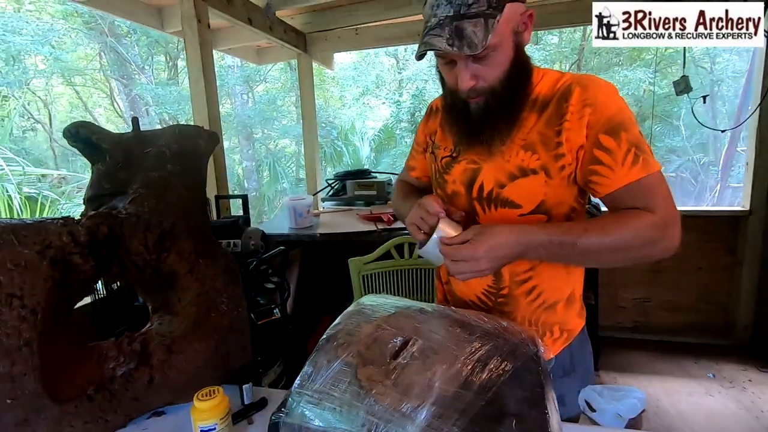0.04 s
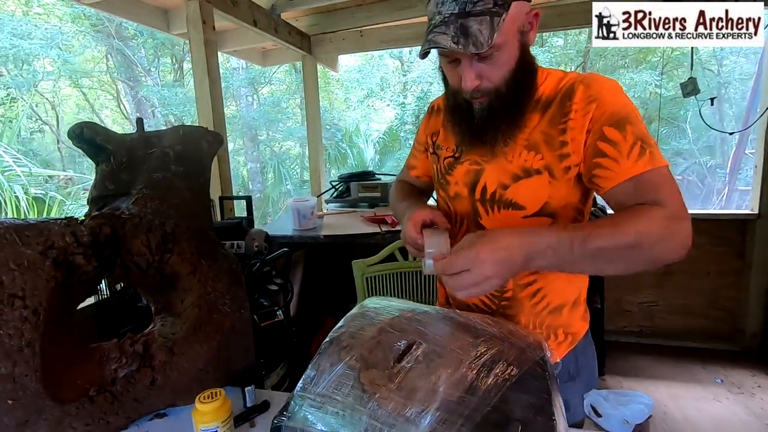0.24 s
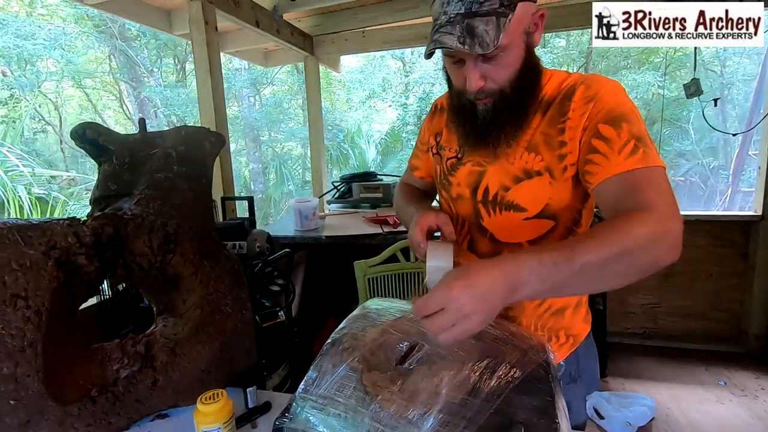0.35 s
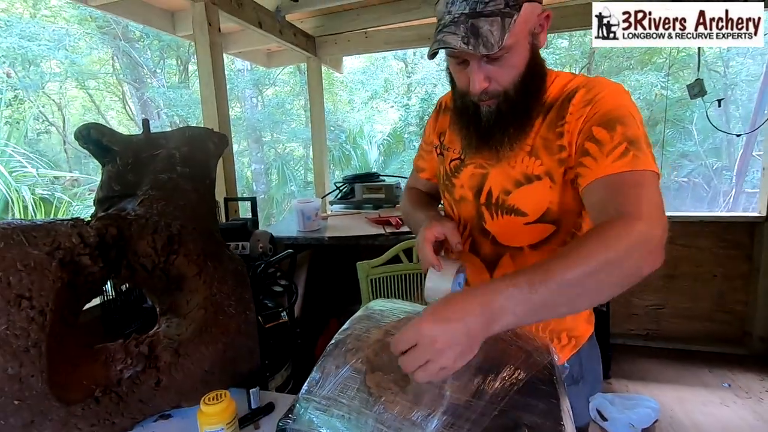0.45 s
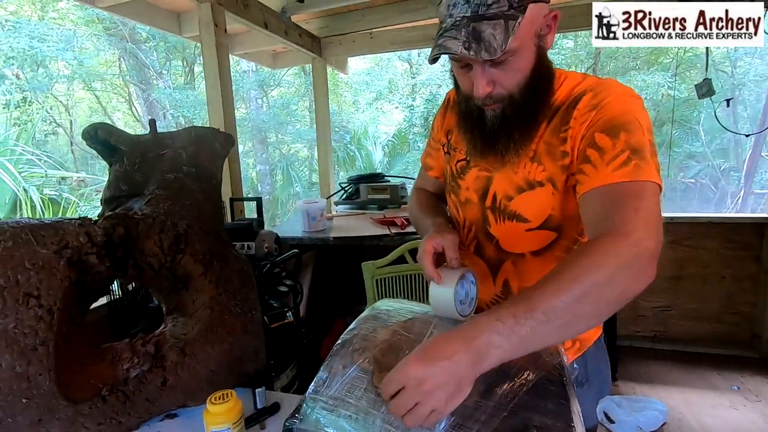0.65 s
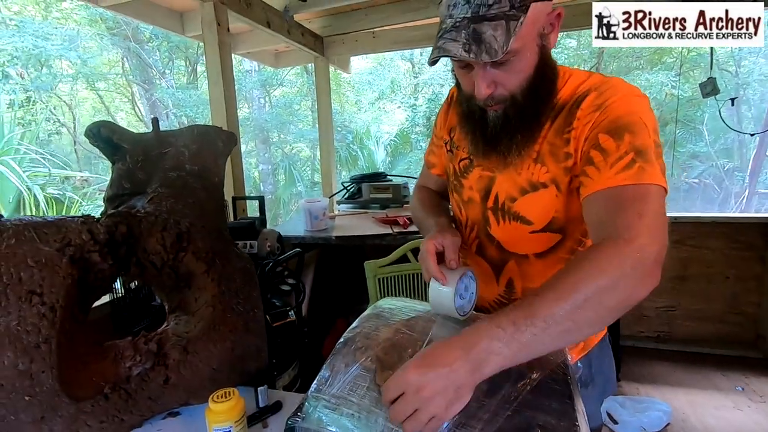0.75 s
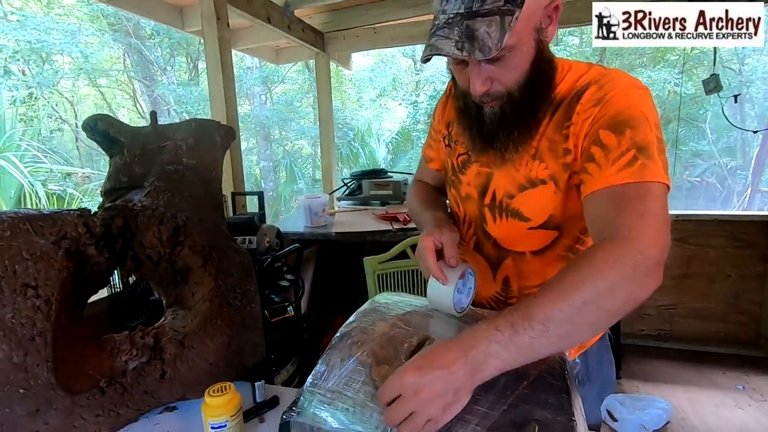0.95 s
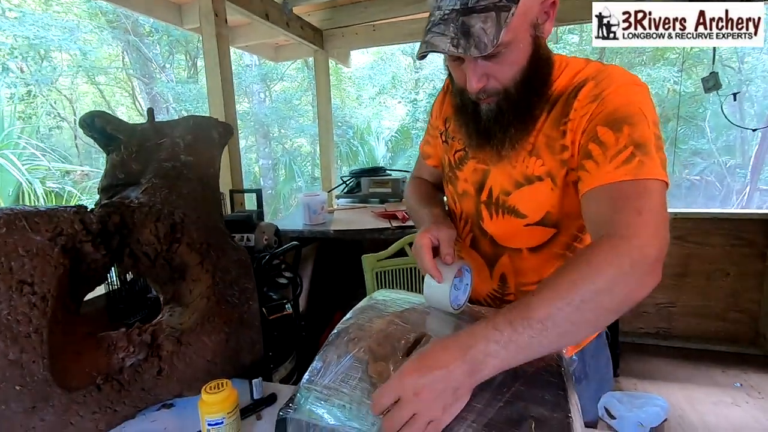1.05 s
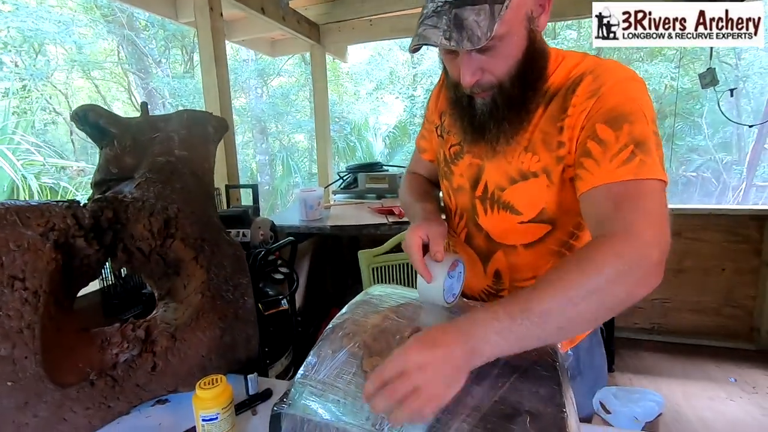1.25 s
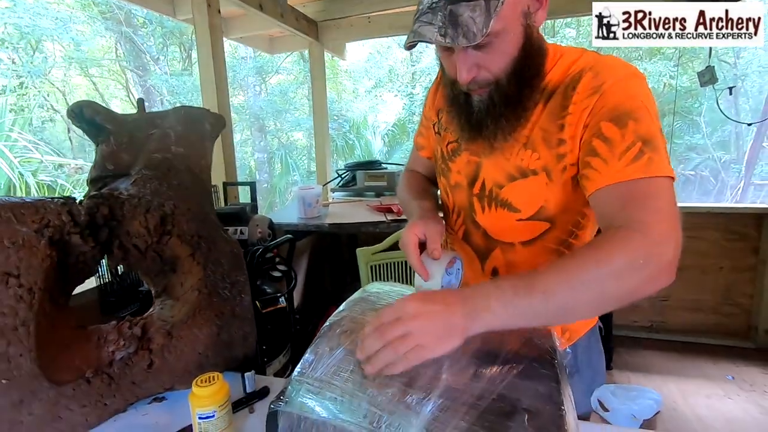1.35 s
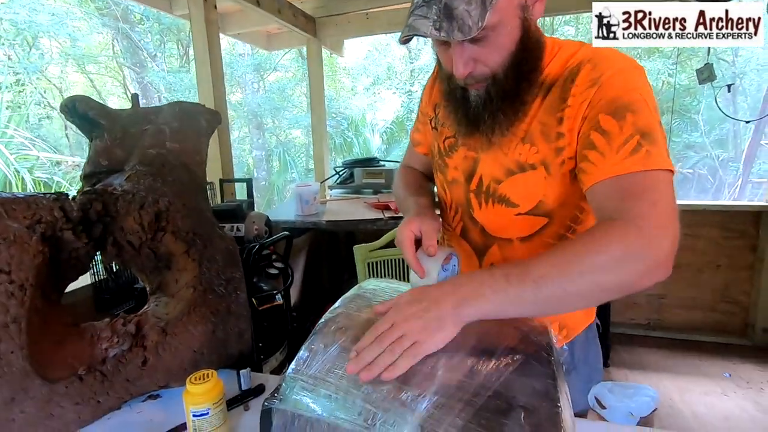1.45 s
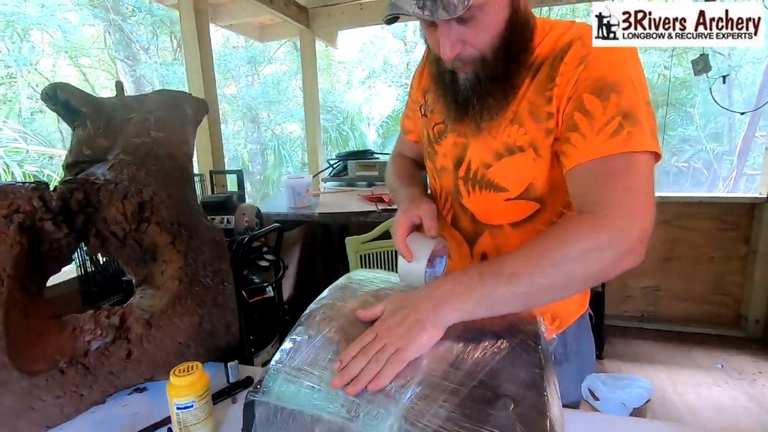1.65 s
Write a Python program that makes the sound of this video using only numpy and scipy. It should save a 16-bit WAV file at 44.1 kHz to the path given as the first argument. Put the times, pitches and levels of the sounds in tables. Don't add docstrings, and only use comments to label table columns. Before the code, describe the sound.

Adhesive tape is torn off a roll in one longer rasping rip and a few shorter jerks, then fingers land on plastic sheet with a sharp snap; small wooden shed, close stereo microphone, faint outdoor hiss.

```python
import sys
import numpy as np
from scipy import signal
from scipy.io import wavfile
from scipy.ndimage import uniform_filter1d

SR = 44100
rng = np.random.default_rng(int(sys.argv[2]) if len(sys.argv) > 2 else 0)


def wav_out(sig):
    wavfile.write(sys.argv[1], SR, np.round(np.clip(np.atleast_2d(sig).T, -1, 1) * 32767).astype(np.int16))


def boost(x):
    u = np.asarray(x, float) / 20
    return 10 ** u


N = 74970


def evened(x):
    return x / np.sqrt(np.mean(x ** 2) + 1e-20)


def read(points, hz):
    f, value = np.transpose(points)
    return np.interp(np.log(hz + 1), np.log(f + 1), value)


def along(points, column=1):
    rows = np.array(points, float)
    return np.interp(np.arange(N) / SR, rows[:, 0], rows[:, column])


def colour(x, points):
    level_db = np.maximum(read(points, abs(np.fft.fftfreq(4096, 1 / SR))), -100)
    log_gain = np.log(boost(level_db))
    taps = np.fft.ifft(np.exp(np.conj(signal.hilbert(log_gain)))).real[:2048]
    return signal.oaconvolve(x, taps)[:N]


def resonate(x, hz, width_hz):
    turn = np.exp(2j * np.pi * np.cumsum(hz * np.ones(len(x))) / SR)
    r = np.exp(-np.pi * width_hz / SR)
    return 2 * (turn * signal.lfilter([1 - r], [1, -r], x / turn)).real


def wander(seconds):
    size = max(round(seconds * SR), 1)
    smooth = uniform_filter1d(rng.standard_normal(N), size)
    return evened(uniform_filter1d(smooth, size))


def slips(per_s, spread_db, clump_db):
    size_db = spread_db * np.minimum(rng.exponential(1, N), 3) + clump_db * wander(.002)
    happens = rng.random(N) < per_s / SR
    return evened(boost(size_db) * happens * rng.choice([-1., 1.], N))


def background():
    # pitch_hz, level_db
    air_spectrum = [(24, -63), (45, -10.5), (93, -9), (242, -8), (600, -11.5), (1000, -15), (3600, -12.5),
                    (9200, -24), (12500, -49), (16000, -48)]
    # time_s, level_db
    air_level = [(0, -55.5), (.15, -54), (.66, -53), (.75, -61.5), (1.05, -59.5), (1.4, -56.5), (1.7, -54)]
    # time_s, level_db
    rumble_level = [(0, -51.5), (.19, -61.5), (.25, -52.5), (.7, -60), (.8, -60.5), (1.1, -64), (1.3, -55),
                    (1.7, -58)]
    rumble_hz, width_hz, lump_db, air_drift_db = 180.3, 57, 2.5, .8
    air, low = [], []
    for _ in range(2):
        hiss = evened(colour(rng.standard_normal(N), air_spectrum))
        air.append(boost(along(air_level) + air_drift_db * wander(0.0033)) * hiss)
        hum = resonate(rng.standard_normal(N), rumble_hz, width_hz)
        low.append(resonate(hum, rumble_hz, 140))
    lumps = boost(along(rumble_level) + lump_db * wander(0.029))
    return np.array(air) + lumps * evened(np.array(low))


def shed(x, first_s):
    # pitch_hz, decay_s
    decay = [(200, 0.13), (800, 0.26), (3000, 0.19), (8000, 0.18), (14000, 0.18)]
    taps = np.zeros(SR // 2)
    at = np.arange(round(first_s * SR), SR // 2 - 20, 20)
    taps[at + rng.integers(0, 20, len(at))] = rng.choice([-1., 1.], len(at))
    hz, t, z = signal.stft(taps, SR, nperseg=256)
    fade = boost(-60 * t / read(decay, hz)[:, None])
    tail = signal.istft(z * fade, SR, nperseg=256)[1]
    return signal.fftconvolve(x, tail / np.linalg.norm(tail))[:N]


def pushes():
    # start_s, level_db, pitch_hz
    thuds = [(.0, -38.5, 158), (.03, -46, 95), (.046, -39.5, 105), (.05, -44, 190), (.092, -44, 108),
             (.124, -46, 195), (.147, -44, 160), (.183, -44, 150), (.61, -38, 152), (.8, -54, 166),
             (.905, -48, 100), (1.2, -46, 158), (1.268, -38, 185), (1.331, -45.5, 148), (1.51, -47, 172),
             (1.548, -45, 185), (1.657, -41, 172), (1.672, -42, 105)]
    push_s = 0.026
    out, t = np.zeros(N + SR), np.arange(4000) / SR
    swell = t / push_s * 4 * np.exp(-4 * t / push_s)
    for s, db, hz in thuds:
        out[round(s * SR):][:len(t)] += boost(db + 6.5) * swell * np.sin(2 * np.pi * hz * t)
    return out[:N]


def wipe():
    # time_s, level_db, gap_mm
    hand_path = [(1.1, -63.5, 86), (1.17, -56.5, 110), (1.192, -51, 100), (1.22, -48.5, 150),
                 (1.255, -48.5, 78), (1.285, -45, 61), (1.298, -40, 78), (1.309, -35.5, 56),
                 (1.317, -42, 28), (1.326, -34.5, 24.6), (1.336, -45.5, 10.3), (1.39, -68, 8.9),
                 (1.645, -72, 28), (1.66, -59, 37), (1.685, -51, 32), (1.7, -43, 31)]
    # pitch_hz, level_db
    skin = [(180, -55), (300, -5), (900, -13.5), (1300, -4.5), (3600, -2), (6000, -4), (12300, -13.5),
            (16000, -13)]
    landing_s = 1.27
    rub, at = colour(slips(12000, 0.84, .8), skin), np.arange(N)
    delay = along(hand_path, column=2) * 2e-3 / 343 * SR
    echo = .68 * np.where(at / SR > landing_s, 1, .25)
    trapped = sum((-echo) ** k * np.interp(at - k * delay, at, rub) for k in range(4))
    return boost(along(hand_path)) * evened(trapped * np.sqrt(1 - echo ** 2))


def fingers():
    # start_s, level_db
    snaps = [
        (1.2640, -22),
        (1.2681, -17.5),
    ]
    # start_s, level_db, pitch_hz, ring_s
    taps = [(0.056, -46, 5940, 0.026), (0.062, -42.5, 3680, 0.018), (.143, -44.5, 1025, 0.024),
            (0.147, -44.5, 6020, 0.086), (1.121, -49, 7280, 0.068), (1.122, -50, 1305, 0.05),
            (1.2634, -31, 3550, 0.019), (1.2686, -33, 7360, 0.01), (1.2686, -30.5, 803, 0.024),
            (1.273, -25, 2980, .02), (1.274, -32, 4320, .015), (1.281, -39, 503, 0.015),
            (1.465, -40.5, 4290, 0.017), (1.466, -46, 12000, 0.012), (1.667, -35.5, 3770, 0.01),
            (1.668, -41.5, 6240, 0.016), (1.662, -41.5, 675, 0.027), (1.649, -54, 5000, .02),
            (1.678, -42, 3680, 0.012)]
    snap_s, tick_db = 0.003, -6
    out, t = np.zeros(N + SR), np.arange(4000) / SR
    for s, db in snaps:
        noise = np.convolve(rng.standard_normal(len(t) + 2), [1, 0, -1], "valid")
        single_wave = np.sin(2 * np.pi * 5500 * t) * (t < 1 / 5500)
        out[round(s * SR):][:len(t)] += boost(db - 60 * t / snap_s) * (.8 * noise + 2.05 * single_wave)
    for s, db, hz, ring_s in taps:
        noise = rng.standard_normal(len(t))
        body = boost(tick_db) * uniform_filter1d(noise, size=3)
        body += .6 * evened(resonate(noise, hz, 0.2 * hz))
        body += 1.1 * np.sin(2 * np.pi * hz * t)
        attack = np.minimum(t / (0.069 * ring_s), 1)
        out[round(s * SR):][:len(t)] += boost(db - 60 * t / ring_s) * attack * body
    return out[:N]


def cracks():
    # start_s, level_db
    big_slips = [(0.2073, -10.9), (0.2166, -10.6), (0.2237, -6.7), (0.2346, -9.8), (0.2561, -8.9),
                 (0.2712, -8.3), (0.2746, -8.9), (0.2828, -10.1), (0.2867, -8.6), (0.2901, -9.7),
                 (0.3111, -10.4), (0.3143, -9.7), (0.3385, -16.4), (0.432, -13.4), (0.4502, -12.8),
                 (0.4726, -22.7), (0.5247, -14.8), (0.5307, -15.6), (0.5336, -15.2), (0.5477, -14.8),
                 (0.6007, -19.6), (0.6082, -13.5), (0.616, -15.7), (0.6272, -22.1)]
    crack_hz, crack_s, crack_db = 3600, .0016, 2
    out, t = np.zeros(N), np.arange(200) / SR
    for (s, db), (sign, detune) in zip(big_slips, rng.random((len(big_slips), 2))):
        ring = np.sin(2 * np.pi * crack_hz * (0.96 + 0.26 * detune) * t)
        fade = boost(db + crack_db - 60 * t / crack_s)
        out[round(s * SR):][:len(t)] += np.sign(sign - .5) * fade * ring
    return out


def hollows(glue):
    # length_s, pitch_hz, level_db
    tones = [(0.021, 594, -36), (.03, 235, -32), (0.015, 1020, -30.5), (0.036, 2320, -20),
             (0.04, 3520, -27.5), (0.003, 2930, -19), (0.021, 2120, -27), (0.0064, 746, -24),
             (0.013, 760, -40.5), (0.05, 218, -39), (0.0028, 1530, -30), (0.0065, 1050, -31),
             (0.019, 363, -41), (0.0039, 1100, -42), (0.013, 220, -37.5), (0.022, 430, -48.5),
             (0.0045, 400, -29.5), (0.0066, 700, -28), (0.0042, 1200, -41), (0.0052, 3580, -25),
             (0.032, 3800, -25.5), (0.007, 8650, -23.5), (0.0057, 8070, -27.5), (0.0062, 7600, -40),
             (0.0095, 1292, -25.5), (0.026, 3220, -39), (0.0053, 1187, -30), (0.03, 272.5, -34),
             (0.013, 1043, -33), (0.0091, 3140, -26.5)]
    tone_starts = [.283, .275, .3, .28, .27, .343, .343, .438, .471, .432, .4315, .52, .525, .6, .6, .64,
                   .246, .246, .246, .436, .208, .219, .604, .545, .29, .532, .61, .322, .436, .309]
    sharpness = 10.6
    steady, waver = .6, .022
    lead_s = .04
    out = np.zeros(N)
    for start, (length, hz, db) in zip(tone_starts, tones):
        first = round((start - lead_s) * SR)
        part = glue[first:first + 8192]
        t = np.arange(len(part)) / SR - lead_s
        drift = evened(uniform_filter1d(rng.standard_normal(len(part)), size=300))
        strays = hz * (1 + waver * drift)
        tone = resonate(part, strays, hz / sharpness)
        tone = resonate(tone, strays, 3 * hz / sharpness)
        tone = tone / (abs(signal.hilbert(tone)) + 0.12 * np.std(tone)) ** steady
        swell = np.clip(t / 0.0027, 0, 1) * boost(-1500 * np.maximum(t - length, 0))
        heard = (t > 0) & (t < length + .002)
        out[first:first + len(part)] += boost(db) * swell * tone / np.std(tone[heard])
    return out


def tape():
    # hold_s, level_db, brightness_db, span_ring_db
    jerks = [(0.01, -44.5, 11.5, 7.5), (0.001, -39, 18, 7), (0.038, -17, 5.5, -1.5), (0.02, -19, 4.5, 8.5),
             (0.055, -18.5, 1.5, 4), (0.019, -27, -2.5, 5), (0.014, -24, 0.5, 2.5), (0.053, -31, -1, -2.5),
             (0.0073, -16, 2.5, -4), (0.017, -21, 3.5, 1), (0.024, -25.5, 0.5, -6.5), (0.023, -20.5, 5, -8),
             (0.023, -29.5, 11.5, -23), (0.016, -24, 1.5, -19), (0.0022, -19, -2, -13),
             (0.014, -23, 6.5, 0), (0.018, -39.5, -7, -4)]
    jerk_starts = [.187, .2028, .2046, .243, .268, .325, .342, .358, .4312, .437, .452, .5197, .54, .563,
                   .600, .6035, .622]
    # time_s, pitch_hz
    span_path = [(.2, 3540), (.236, 3920), (.246, 3100), (.262, 2560), (.278, 3380), (.3, 2760),
                 (.36, 2650), (.43, 3400), (.446, 3460), (.46, 2500), (.52, 2900), (.62, 2970)]
    # pitch_hz, level_db
    film_spectrum = [(710, -20.5), (1200, -10), (2570, -4), (3660, -4), (5060, -11.5), (5610, -8),
                     (7680, -3.5), (8430, -6.5), (14500, -12.5)]
    # pitch_hz, level_db
    roll_spectrum = [(90, -43.5), (170, -14.5), (420, -1.5), (750, 0), (1200, 3.5), (1800, 2), (2500, -5.5),
                     (4000, -48)]
    span_db, film_db, roll_db = -7.5, -9.5, -7.5
    rise_s, let_go_db_per_s = .0006, -2000
    wake_s, wake_hz = .045, 480
    t = np.arange(N) / SR
    glue = slips(7000, 3.8, 1.4)
    span_hz = along(span_path)
    span = resonate(resonate(glue, span_hz, 990), span_hz, 4400)
    span = evened(signal.lfilter([1, -1], 1, span))
    film = evened(colour(slips(14000, 3.7, 0.7), film_spectrum))
    roll = evened(colour(glue, roll_spectrum))
    out = np.zeros(N)
    for start, (hold, db, bright_db, ring_db) in zip(jerk_starts, jerks):
        fade_db = let_go_db_per_s * np.maximum(t - start - hold, 0)
        pull = np.clip((t - start) / rise_s, 0, 1) * boost(db + fade_db)
        rasp = boost(span_db + ring_db) * span + boost(film_db + bright_db) * film
        out += pull * (rasp + boost(roll_db - 0.74 * bright_db) * roll)
    thin = signal.sosfilt(signal.butter(4, wake_hz, "hp", fs=SR, output="sos"), out)
    awake = np.clip((t - jerk_starts[2]) / wake_s, 0, 1) ** 4
    return thin + awake * (out - thin) + hollows(glue)


def scene():
    # pitch_hz, level_db
    near_spectrum = [(60, -34), (130, -7.5), (220, -1.5), (9000, -0.5), (12000, -14), (14600, -15),
                     (15750, -20), (16000, -49)]
    # pitch_hz, level_db
    ports = [(60, -44), (110, -5.5), (200, -18.5), (380, -12), (700, -6), (1290, -2.5), (2380, -8),
             (4400, -9.5), (8120, -0.5), (15000, 1)]
    apart = .6
    shed_db, lean = -8, 0.068
    hand = fingers() + wipe() + cracks()
    near, other = colour(tape() + hand, near_spectrum), colour(tape(), near_spectrum)
    paths = boost(-60 * np.arange(600) / SR / 0.0067) * rng.standard_normal((2, 600))
    paths = paths / np.linalg.norm(paths, axis=1)[:, None]
    alike = signal.oaconvolve(near, paths[0])[:N]
    different = other + signal.oaconvolve(colour(hand, near_spectrum), paths[1])[:N]
    scatter = np.sqrt(1 - apart) * alike + np.sqrt(apart) * different
    mid, side = background()
    mid = mid + pushes() + near + boost(shed_db) * shed(near, .004)
    side = side + scatter + boost(shed_db + 1.0) * shed(near, 0.0014)
    side = colour(side, ports) - lean * mid
    return np.array([mid + side, mid - side])


def roll_off(x):
    return signal.sosfilt(signal.butter(12, 16490, fs=SR, output="sos"), x)


def record(dry):
    # from_s, to_s
    narrow_spans = [
        (.212, .425),
        (.445, .475),
        (.533, .548),
    ]
    edge_hz, narrow_edge_hz, ceiling = 16400, 15050, .75
    soft = ceiling * np.tanh(dry / ceiling)
    wide, narrow = [
        signal.oaconvolve(soft, signal.firwin(255, hz, window=("kaiser", 9), fs=SR)[None], "same")
        for hz in (edge_hz, narrow_edge_hz)]
    t = np.arange(N) / SR
    narrowing = sum(1. * ((t > a) & (t < b)) for a, b in narrow_spans)
    narrowing = uniform_filter1d(narrowing, size=200)
    return roll_off(wide + narrowing * (narrow - wide))


dry = scene()
out = record(dry)
wav_out(out)
```